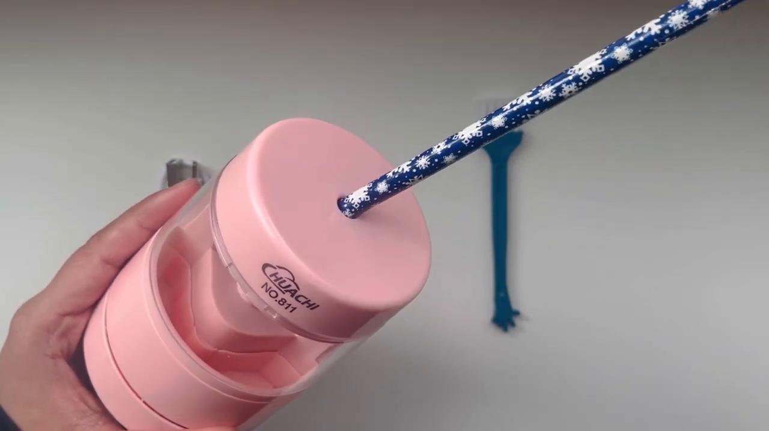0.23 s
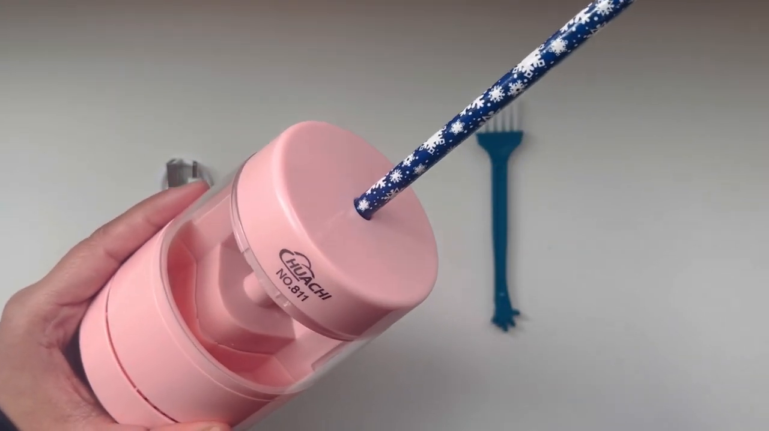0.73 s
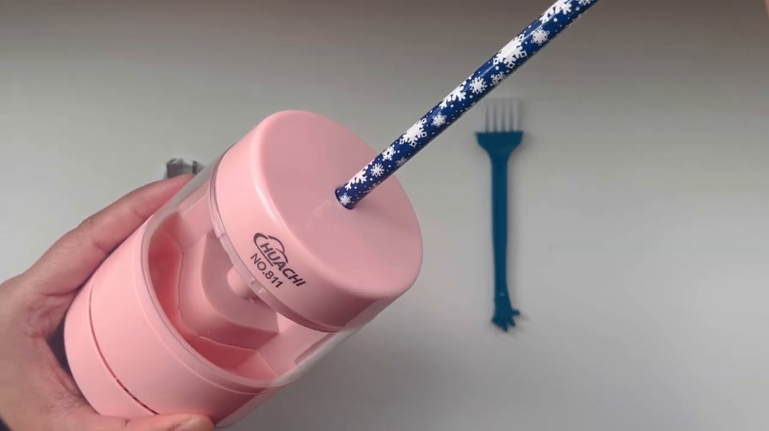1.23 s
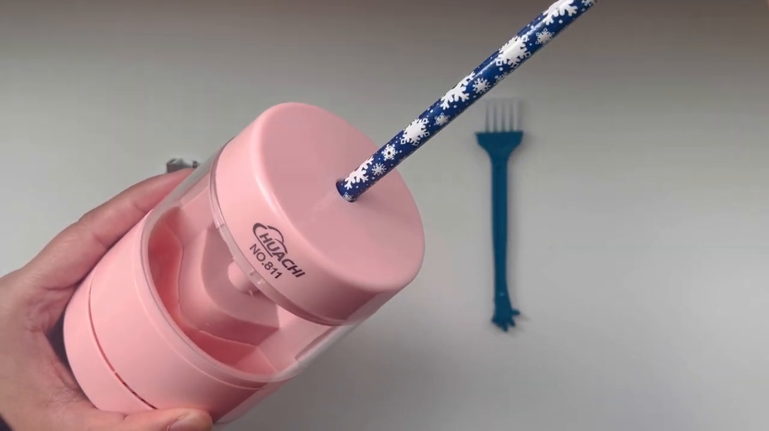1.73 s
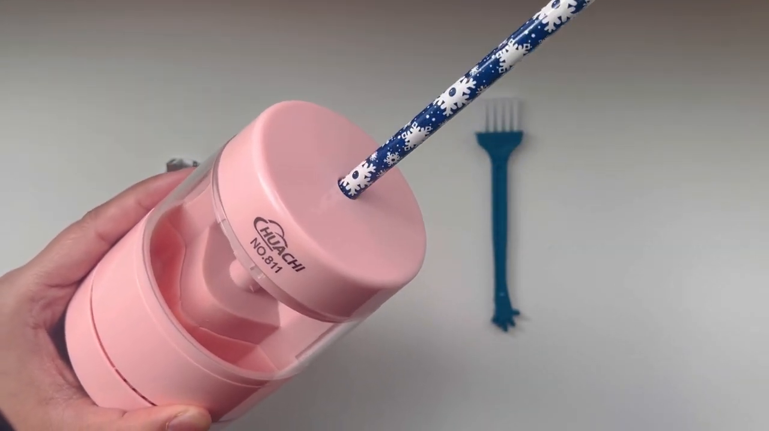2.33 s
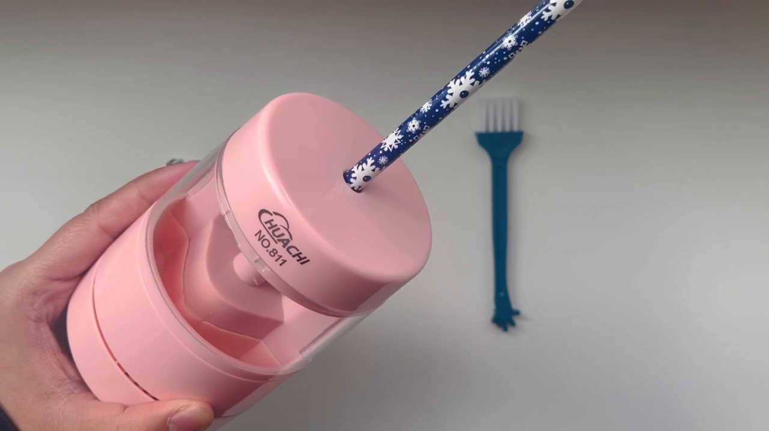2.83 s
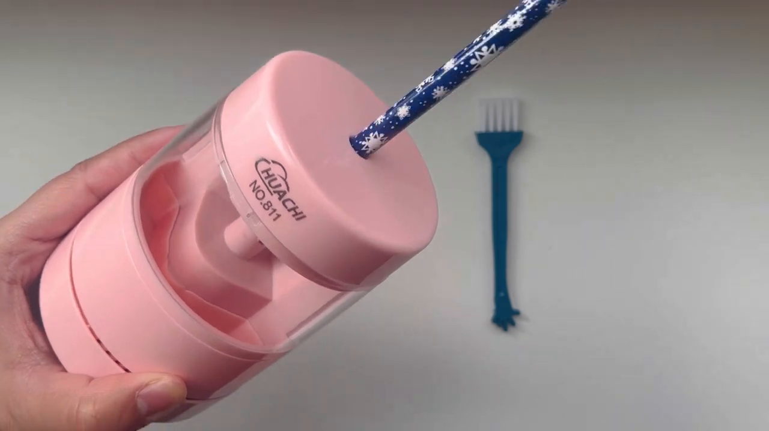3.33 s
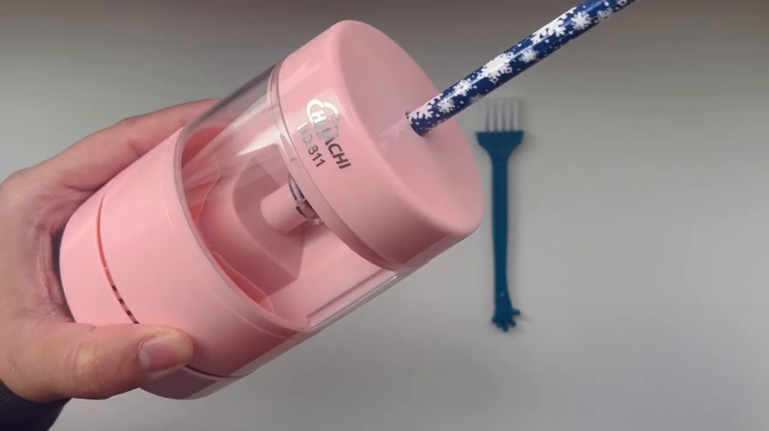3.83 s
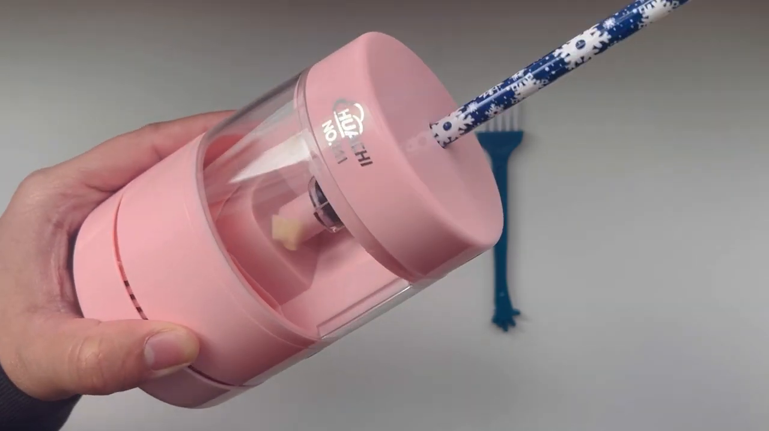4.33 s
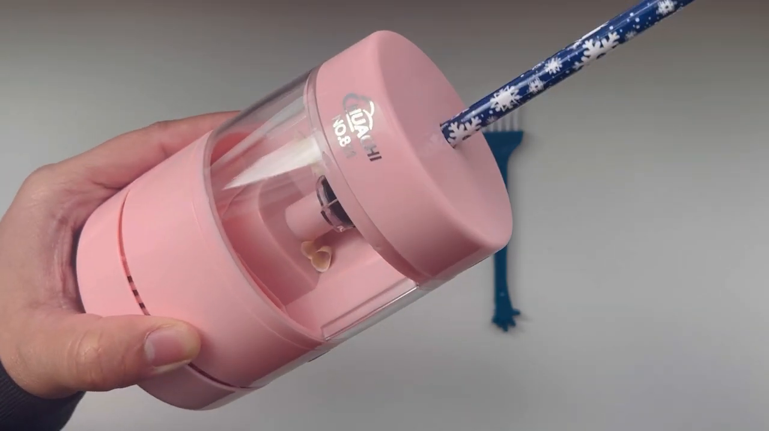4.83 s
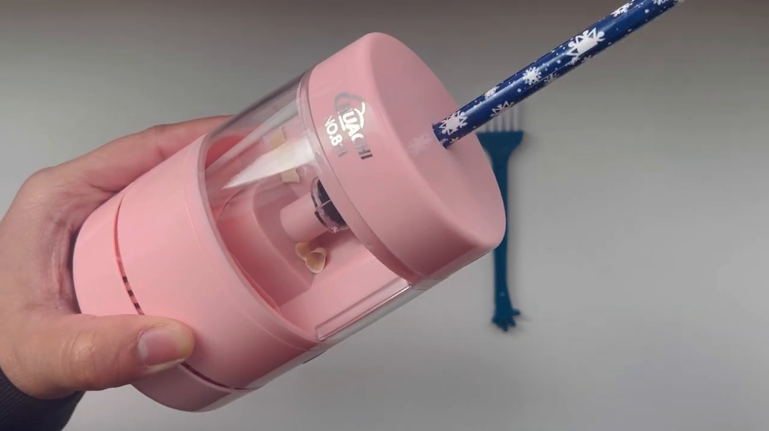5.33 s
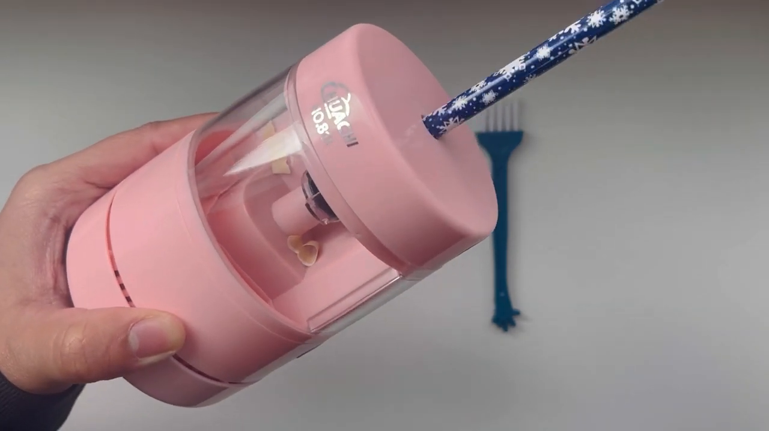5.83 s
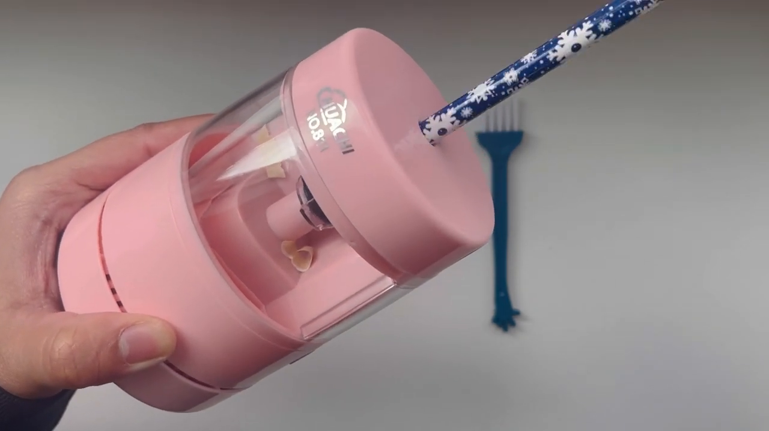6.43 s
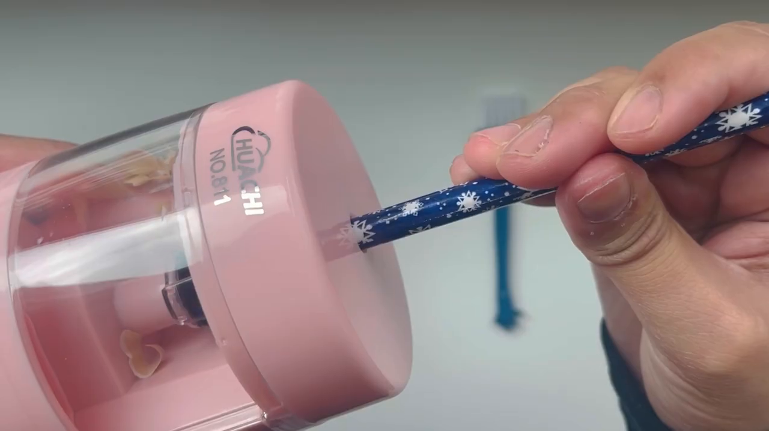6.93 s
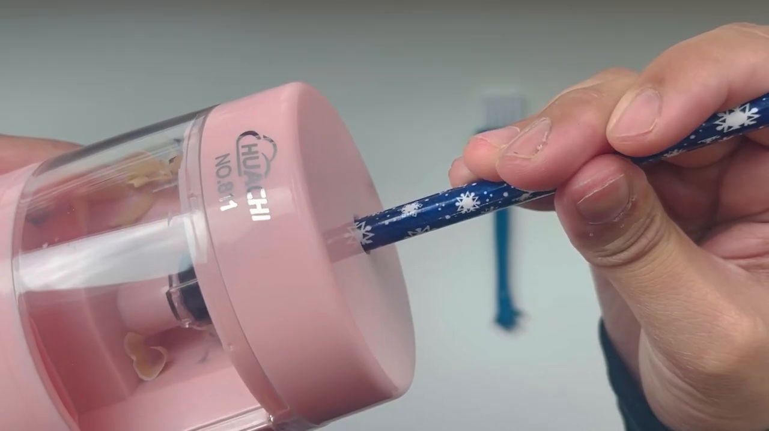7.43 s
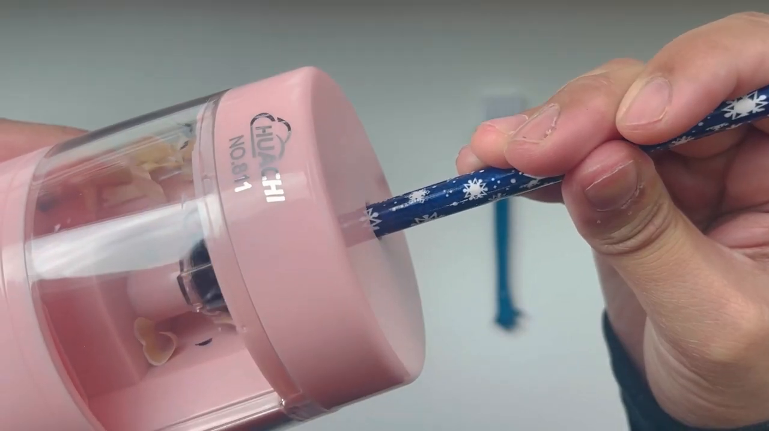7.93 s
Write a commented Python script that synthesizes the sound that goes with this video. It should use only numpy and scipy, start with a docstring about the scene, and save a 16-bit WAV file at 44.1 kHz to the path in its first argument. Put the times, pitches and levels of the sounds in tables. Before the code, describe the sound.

Close-up battery pencil sharpener: soft handling ticks, a switch click, then a continuous high gear whine with gritty wood crackle, cutting harder near the end.

```python
"""Battery pencil sharpener

A hand-held sharpener, close by in a small room. A pencil rubs along the guide and trips the switch; a small
motor spins up, its plastic gears whine and rattle, and each bite of the blade slows it. Near the end it is
held closer and cuts harder. The gears are tones locked to one shaft, the wood is coloured noise,
the clicks are decaying rings, and the room adds an echo and a faint drone."""
import sys
import numpy as np
from scipy import signal
from scipy.fft import rfft, irfft, next_fast_len
from scipy.io import wavfile
from scipy.ndimage import map_coordinates

SR = 44100
rng = np.random.default_rng(int(sys.argv[2]) if len(sys.argv) > 2 else 0)


def dump_mix(stems):
    """Bounce the given channels to the path in sys.argv[1] as a 16-bit WAV at rate SR."""
    frames = np.atleast_2d(stems).T  # one column per channel
    limited = np.clip(frames, -1, 1)  # hard clip at full scale
    pcm = np.round(limited * 32767).astype(np.int16)
    wavfile.write(sys.argv[1], SR, pcm)


N = 361619  # length in samples
TIME = np.arange(N) / SR  # s


def amp(db):
    """Decibels to gain."""
    return 10 ** (np.asarray(db) / 20)


def unit(x):
    """Scaled to rms 1."""
    return x / np.sqrt(np.mean(x ** 2) + 1e-20)


def along(points, hz):
    """Read a (frequency, value) curve on a log frequency axis."""
    point_hz, value = np.transpose(points)
    return np.interp(np.log(hz + 1), np.log(point_hz + 1), value)


def curves(rows):
    """One value per sample for each column after the time."""
    time_s, *columns = np.transpose(rows)
    return [np.interp(TIME, time_s, column) for column in columns]


def bump(s, length):
    """A smooth rise from 0 to 1 and back, centred on s."""
    return np.cos(np.pi * np.clip((TIME - s) / length, -.5, .5)) ** 2


def noise():
    """White noise of rms 1."""
    return rng.standard_normal(N)


def wobble(rate):
    """A smooth random curve, rate knots a second."""
    knots = rng.standard_normal(int(N * rate / SR) + 4)
    return map_coordinates(knots, [np.arange(N) * rate / SR])


def filtered(x, response):
    """x times a complex response of frequency."""
    m = next_fast_len(N + SR // 2)
    return irfft(rfft(x, m) * response(np.fft.rfftfreq(m, 1 / SR)), m)[..., :N]


def coloured(x, spectrum):
    """x given a spectrum, at rms 1."""
    return unit(filtered(x, lambda hz: amp(along(spectrum, hz))))


def tone(cycles):
    """A sine of rms 1 that starts anywhere in its cycle."""
    return np.sqrt(2) * np.sin(2 * np.pi * (cycles + rng.random()))


# colour of the room's rumble: pitch_hz [Hz], relative level_db [dB per Hz]
RUMBLE_COLOUR = [(20, -37), (45, -5), (80, 5.5), (110, -5), (150, -7), (300, -15), (1000, -52), (3000, -43),
                 (14000, -51)]
# the rumble swells: centre_s [s], length_s [s], extra level_db [dB]
RUMBLE_SWELLS = [(.18, .35, 6), (1.28, 0.28, 7), (1.849, .5, 7), (2.26, 0.42, 14.5), (8.1, .9, 7)]
# the two hums, low and high: pitch_hz [Hz]
HUM_PITCHES = [98, 130.8]
# levels of the hums before they waver: time_s [s], low_level_db [dB], high_level_db [dB]
HUM_LEVELS = [(0, -72, -70), (.45, -73, -72), (.75, -57, -58), (1.15, -83, -63.5), (1.7, -59, -62.5),
              (2.9, -67, -62), (3.7, -60, -53.5), (4.6, -67, -62.5), (5.15, -65, -55.5), (5.9, -71, -67),
              (6.55, -55.5, -59), (7.15, -78, -77), (8.2, -68, -65)]
RUMBLE_DB = -65  # between swells


def drone(waver_db=2):
    """Low rumble of filtered noise that swells now and then, with two hums wavering in level and phase."""
    rumble_db = RUMBLE_DB + sum(db * bump(s, length) for s, length, db in RUMBLE_SWELLS)
    hums = np.zeros(N)
    for hz, db in zip(HUM_PITCHES, curves(HUM_LEVELS)):
        level = amp(db + waver_db * wobble(5))
        hums += level * tone(hz * TIME + 0.11 * wobble(7))
    return amp(rumble_db) * coloured(noise(), RUMBLE_COLOUR) + hums


# how long the echo rings: pitch_hz [Hz], t60_s [s]
ROOM_DECAY = [(200, 0.55), (2000, 0.35), (7000, 0.29), (12000, 0.14)]
# how strongly the walls answer: pitch_hz [Hz], echo level_db [dB]
WALL_COLOUR = [(100, -24), (400, -8), (1000, -9), (1600, -17), (12000, -18)]


def room(x):
    """The walls' answer: a decaying noise tail, different on each side, its highs dying sooner."""
    hz, t, bins = signal.stft(rng.standard_normal((2, SR // 2)), SR, nperseg=256)
    decay = amp(-60 * t / along(ROOM_DECAY, hz)[:, None])
    tail = signal.istft(bins * decay, SR, nperseg=256)[1]
    echo = signal.fftconvolve(x[None], tail / np.linalg.norm(tail[0]), axes=1)[:, :N]
    return filtered(echo, lambda hz: amp(along(WALL_COLOUR, hz)))


# colour of fingers on the case: pitch_hz [Hz], relative level_db [dB per Hz]
SKIN_COLOUR = [(200, -1), (600, 5), (1500, 7), (2500, -12), (4000, -25), (7000, -13), (12000, -27)]
# colour of the pencil rubbing in the guide: pitch_hz [Hz], relative level_db [dB per Hz]
RUB_COLOUR = [(180, -37), (300, -18), (527, -14), (660, -17), (1400, -6.5), (2130, -1.5), (2940, -12),
              (10800, -14.5), (14000, -66)]
# fingers shift on the case: time_s [s], level_db [dB]
GRIP_LEVEL = [(.08, -90), (.098, -74), (.103, -63), (.12, -76), (.146, -78.5), (.152, -70), (.19, -72),
              (.24, -69), (.39, -86), (.41, -78), (.48, -60), (.54, -74), (.64, -89.5)]
# the pencil slides in the guide: time_s [s], level_db [dB]
SLIDE_LEVEL = [(.39, -99), (.41, -67), (.445, -58), (.485, -57), (.5, -85), (.55, -110)]
# pencil and switch clicks: start_s [s], level_db before the ring and crack trims [dB]
CLICK_TIMES = [(.15, -64), (0.201, -39), (0.252, -24.5), (0.459, -40), (0.467, -35), (0.481, -27.5),
               (0.487, -32), (0.651, -28)]
# modes of the guide tube: pitch_hz [Hz], relative level_db [dB], t60_s before the cap on ringing [s]
GUIDE_MODES = [(640, -23, 0.15), (1030, -2, 0.068), (1536, 1, 0.061), (2420, -3, 0.045), (3900, 10, 0.012),
               (5260, -16, 0.03), (5949, -23.5, 0.079), (6980, -1, 0.036), (8160, 7, 0.015),
               (10850, -38, 0.093)]


def friction(level_rows, spectrum):
    """Skin or wood drags over plastic: noise with a fast random grain."""
    grain = amp(4.1 * wobble(147.4))
    return amp(curves(level_rows)[0]) * coloured(noise() * grain, spectrum)


def pencil(crack_t60=0.033, longest_ring_t60=0.045, ring_db=-20, crack_db=-11):
    """Fingers shift on the case; the pencil rubs along the guide, ticks against it and closes the switch."""
    out, t = np.zeros(N), np.arange(SR // 4) / SR
    rub = coloured(noise(), RUB_COLOUR)
    for s, db in CLICK_TIMES:
        ring = np.zeros(len(t))
        for hz, level, t60 in GUIDE_MODES:
            struck_db = level + 2 * rng.standard_normal()  # no two clicks strike alike
            decay = amp(struck_db - 60 * t / min(t60, longest_ring_t60))
            ring += decay * np.sin(2 * np.pi * hz * t)
        at = round(s * SR)
        crack = amp(db + crack_db - 60 * t / crack_t60) * rub[at:at + len(t)]
        out[at:at + len(t)] += amp(db + ring_db) * ring + crack
    return out + friction(SLIDE_LEVEL, RUB_COLOUR) + friction(GRIP_LEVEL, SKIN_COLOUR)


# broad colour of the housing: pitch_hz [Hz], relative level_db [dB per Hz]
HOUSING_COLOUR = [(150, -19), (400, -27), (800, -22.5), (1400, -5.5), (3300, -12), (4600, -4.5),
                  (6200, -2.5), (8800, 4), (11500, 2.5), (12400, -14), (13200, -8.5), (14200, -62)]
# resonances of the housing on top: pitch_hz [Hz], width_hz [Hz], boost_db [dB]
HOUSING_MODES = [(1858, 178, 16), (2386, 264, 12.5), (3041, 380, 13.5), (3615, 184, 13), (4023, 367, 16.5),
                 (4826, 223, 8), (5530, 755, 8.5), (6600, 280, 3), (7590, 660, 11.5), (8404, 250, 8.5),
                 (9800, 180, 11.5), (10700, 140, 6.5)]


def shell(x):
    """x radiated by the plastic housing with its resonances, at rms 1."""
    def response(hz):
        peaks = sum(db * np.exp(-((hz - centre) / width) ** 2) for centre, width, db in HOUSING_MODES)
        return amp(along(HOUSING_COLOUR, hz) + peaks)
    return unit(filtered(x, response))


# colour of snapping fibres, on top of the housing's: pitch_hz [Hz], relative level_db [dB]
CRACKLE_COLOUR = [(300, -13), (1500, -5), (6000, -3.5), (9000, -7.5), (11500, 6), (13500, 3.5)]
# single splinters crack off: start_s [s], starting level_db [dB]
SPLINTER_TIMES = [(1.992, -14), (2.006, -19), (2.023, -13), (2.039, -17), (2.043, -18)]


def splinters(t60=.002):
    """A few splinters crack off the pencil, each a very short bright burst of noise."""
    bursts = np.zeros(N)
    for s, db in SPLINTER_TIMES:
        bursts += (TIME >= s) * amp(db - 60 * np.maximum(TIME - s, 0) / t60)
    return bursts * shell(coloured(noise(), CRACKLE_COLOUR))


# gears taking up speed: time_s [s], level_db [dB]
STRAIN_LEVEL = [(.652, -130), (.656, -51), (.672, -39), (.7, -33), (.715, -35), (.75, -50), (.8, -120)]
# colour of that grinding: pitch_hz [Hz], relative level_db [dB per Hz]
SQUEAL_COLOUR = [(1500, -29), (2200, -12), (2700, 4), (3300, -6), (5200, -25), (6200, 7.5), (7200, -11),
                 (12000, -34)]


def spin_up(grain_db=1.0):
    """The teeth grind briefly while the motor takes up speed: grainy noise."""
    grain = amp(grain_db * wobble(350))
    return amp(curves(STRAIN_LEVEL)[0]) * coloured(noise() * grain, SQUEAL_COLOUR)


# motor shaft between bites, before drag and flutter: time_s [s], speed [turns per second]
SHAFT_SPEED = [(.8, 186.6), (2.3, 186.5), (3.03, 190), (3.25, 187), (4.65, 192.4), (6.6, 192.4),
               (7.5, 190.5), (8.2, 187.5)]
# the blade bites deeper and brakes the motor: centre_s [s], length_s [s], speed lost [turns per second]
BLADE_BITES = [(2.94, .18, 6), (3.54, .21, 3), (4.36, .24, 3.8), (4.78, .17, 2), (5.17, .34, 4.6),
               (5.36, .22, 2), (5.6, .21, 2.8), (5.98, .3, 3.4), (6.17, .26, 2), (6.43, .24, 3.2),
               (6.85, .24, 6), (6.99, .16, 5), (7.25, .38, 5), (7.7, .19, 9.5), (8.09, .25, 11.8)]
# how the gears sit: time_s [s], tooth pattern_db [dB], play [0-1], second mesh low_tone_db [dB],
# second mesh high_tone_db [dB], fifth overtone_db [dB]
GEAR_SEATING = [(.65, -13, 0.82, -55, -41, -50), (.9, -16, 0.61, -67, -43.5, -63),
                (2.9, -17.5, 0.58, -67, -44, -50), (3.6, -6, 0.34, -66, -47, -33.5),
                (6.9, -4, .3, -78, -45, -40), (7, -34, 0.5, -54, -63, -29), (8.2, -49, 0.51, -52, -56, -34)]
SWITCH_S, SPIN_UP_S = .639, .034  # the motor starts, and closes in on its speed with this time constant
BLADE_GEARING = 38.4  # motor turns per blade turn
HEAVY_S = 1.74  # a moment when the blade meets the pencil's high side
DRAG_HZ = 2.2  # turns per second lost there at full play
FLUTTER = .008  # share of speed at full play


def shaft():
    """Motor speed and what the bites take from it; the blade drags once a turn and loose gears flutter."""
    play = curves(GEAR_SEATING)[1]
    running = np.maximum(TIME - SWITCH_S, 0)
    sag = sum(lost * bump(s, length) for s, length, lost in BLADE_BITES)
    speed = curves(SHAFT_SPEED)[0] * (1 - np.exp(-running / SPIN_UP_S)) - sag
    blade_turns = np.cumsum(speed) / SR / BLADE_GEARING
    from_heavy_side = blade_turns - blade_turns[round(HEAVY_S * SR)]
    drag = DRAG_HZ * play * np.cos(2 * np.pi * from_heavy_side)
    return (speed - drag) * (1 + FLUTTER * play * wobble(22)), sag


# swing of the rubbing at 1, 2, 3 times a blade turn: level_db [dB]
BLADE_SWING = [0.22, 0.52, 1.0]


def blade_swing(turns):
    """Gain of the rubbing as the blade goes round, swinging at multiples of its turn."""
    return amp(sum(db * tone((k + 1) * turns / BLADE_GEARING) for k, db in enumerate(BLADE_SWING)))


# how hard the sharpener works, before bites, catches and swings: time_s [s],
# blade scrape_db at full play [dB], gear rattle_db [dB], shaving crackle_db at full play [dB]
WORK_LEVELS = [(.66, -45, -39, -48), (.72, -57, -34, -36), (1, -49.5, -29.5, -30.5), (1.5, -49, -31, -27),
               (2.8, -49, -29.5, -28), (3.4, -52, -29, -27.5), (3.9, -50, -27.5, -37),
               (5.2, -48.5, -28, -32), (6.9, -48.5, -28, -30), (6.98, -46, -26.5, -27.5),
               (8.2, -45.5, -28.5, -25.5)]
# the blade catches in the grain: centre_s [s], extra scrape_db [dB], extra crackle_db [dB]
GRAIN_CATCHES = [(1.59, 7, 5), (2.01, 5, 5), (2.12, -1.5, -1), (2.42, 3, -2), (2.5, 4, 3.5), (2.85, 4, 2),
                 (3.1, 12, 5), (3.22, 9.5, 6.5), (6.96, 9, 7), (7.18, 2, 5), (7.33, 6, 1), (7.57, 3, 4),
                 (7.82, 3, 4), (8.1, 3, -3), (8.19, 3.5, 2)]
# colour of the scrape: pitch_hz [Hz], relative level_db [dB per Hz]
SCRAPE_COLOUR = [(100, -9), (340, -10.5), (550, 0), (850, 2), (1150, 2.5), (1600, -6), (3000, -16),
                 (8000, -40)]
CATCH_S = .1  # length of a catch
BITE_SCRAPE_DB = .3  # a bite scrapes more (dB per turn per second lost)


def blade(sag, grain_db=3.5, snap_db=2.5, uneven_db=1.0):
    """The blade scrapes the wood unevenly while fibres snap off the shaving and tick in the housing."""
    scrape_db, _, crackle_db = curves(WORK_LEVELS)
    play = curves(GEAR_SEATING)[1]
    scrape_db = scrape_db + BITE_SCRAPE_DB * sag + uneven_db * wobble(16)
    crackle_db = crackle_db + uneven_db / 2 * wobble(12)
    for s, extra_scrape_db, extra_crackle_db in GRAIN_CATCHES:
        catch = bump(s, CATCH_S)
        scrape_db += extra_scrape_db * catch
        crackle_db += extra_crackle_db * catch
    scrape = coloured(noise() * amp(grain_db * wobble(200)), SCRAPE_COLOUR)
    crackle = shell(coloured(noise() * amp(snap_db * wobble(1100)), CRACKLE_COLOUR))
    return play * (amp(scrape_db) * scrape + amp(crackle_db) * crackle)


PINION, WHEEL = 10, 32  # teeth
# relative swing of tooth load at 1, 2, 3 .. times a wheel turn: size [ratio]
WHEEL_RUNOUT = [0.88, 1, 0.97, 0.33, 0.23]


def tooth_load(turns, pinion_swing=0.11):
    """Wheel and pinion are out of round, so the load on the teeth swings with each turn, at rms 1."""
    wheel = turns * PINION / WHEEL
    wheel_load = sum(swing * tone((k + 1) * wheel) for k, swing in enumerate(WHEEL_RUNOUT))
    return unit(wheel_load + pinion_swing * tone(turns))


REPEATING_DB = 2.5  # repeating rattle over the chance part, at a tooth pattern of 0 dB
BITE_RATTLE_DB = -0.1357  # a bite holds the gears still (dB per turn per second lost)


def rattle(turns, load, sag, swing_db=-0.1):
    """Tooth flanks rub and knock in the housing: part repeats with every wheel turn, part is chance."""
    share = amp(curves(GEAR_SEATING)[0] + REPEATING_DB)
    flanks = rng.standard_normal(size=720)  # one wheel turn of rough flanks
    place = turns * PINION / WHEEL * len(flanks)
    repeating = unit(map_coordinates(flanks, [place], mode="grid-wrap"))
    knocks = (share * repeating + noise()) / np.sqrt(1 + share ** 2)
    level = amp(curves(WORK_LEVELS)[1] + BITE_RATTLE_DB * sag)
    return level * shell(knocks * amp(swing_db * load))


# motor lines: pitch [multiples of a motor turn]
MOTOR_LINES = [9, 12, 21, 36]
# their levels before they waver: level_db [dB]
MOTOR_LEVELS = [-60, -56, -48.5, -53]
# lines of the wheel's uneven teeth: pitch [multiples of a wheel turn]
WHEEL_LINES = [12, 13, 14, 17, 22, 24, 25, 26, 33, 35, 43, 52]
# their levels at a tooth pattern of 0 dB, before they waver: level_db [dB]
WHEEL_LEVELS = [-64, -55.5, -60, -58, -62, -61, -60, -61, -46, -48, -54, -50]
POLES = 3
POLE_DB, POLE_PLAY_DB = -66, 7.5  # hum of the motor's poles, and its rise at full play


def gear_tones(turns, waver_db=2.04, stage_blur=0.047, middle_tone_db=-5):
    """Weaker lines: the three-pole motor, its imbalance, the wheel's uneven teeth and the second gear stage."""
    def line(cycles, db):
        return amp(db + waver_db * wobble(25)) * tone(cycles)

    pattern_db, play, low_db, high_db, _ = curves(GEAR_SEATING)
    wheel = turns * PINION / WHEEL
    poles = line(POLES * turns, POLE_DB + POLE_PLAY_DB * play)
    motor = poles + sum(line(k * turns, db) for k, db in zip(MOTOR_LINES, MOTOR_LEVELS))
    imbalance_db = curves([(3, -73), (4.5, -67), (6.9, -68), (7, -63)])[0]  # time_s, level_db
    imbalance = line(turns, imbalance_db)
    teeth = sum(line(k * wheel, db + pattern_db) for k, db in zip(WHEEL_LINES, WHEEL_LEVELS))
    second_mesh = PINION * wheel + stage_blur * play * wobble(120)  # play blurs its timing too
    stage_levels = [(2, low_db), (4, high_db + middle_tone_db), (5, high_db)]  # overtone, level_db
    stage = sum(line(k * second_mesh, db) for k, db in stage_levels)
    return motor + imbalance + teeth + stage


# first four overtones of the pinion's mesh between bites, before they waver:
# time_s [s], first_db [dB], second_db [dB], third_db [dB], fourth_db [dB]
WHINE_LEVELS = [(.7, -32.5, -50, -58, -50), (.87, -33, -39.5, -52, -38.5), (1.6, -34.5, -38.5, -42, -30),
                (2.95, -38.5, -35.5, -46, -29), (3.12, -39, -35, -37.5, -27.5),
                (3.35, -45.5, -31, -34, -25.5), (3.7, -47.5, -30, -41.5, -30), (4.1, -38.5, -31, -41, -29),
                (6.9, -36.5, -32.5, -37, -28.5), (7.03, -36, -38.5, -45, -35),
                (7.25, -33.5, -35, -47, -35.5), (7.5, -31.5, -38, -45, -34), (8.2, -32.5, -35, -43, -30)]
# a bite moves the whine upward, overtones 1-4: change_db [dB per turn per second lost]
BITE_TILT = [-0.98, 0.12, 1, 0.18]
# how far the load swings overtones 1-6, before the seating scales it: swing_db [dB]
WHINE_SWING = [5.24, 1.87, 5.1, 4.9, 1.9, 6.1]
SIXTH_DB = -13.5  # the sixth overtone follows the cutting: level against the WORK_LEVELS crackle
WHINE_WAVER_DB, WHINE_GRIT_DB = 3, 1  # slow wavering and fast random swing of each overtone at full play
MESH_SWING, MESH_BLUR = 0.034, 0.039  # teeth meet early or late by runout and by chance (share of a tooth)


def whine(turns, load, sag):
    """Overtones of the tooth rate; load swings their size, and play between teeth blurs their timing."""
    pattern_db, play, _, _, fifth_db = curves(GEAR_SEATING)
    sixth_db = curves(WORK_LEVELS)[2] + SIXTH_DB
    bearing = amp(pattern_db / 2)  # well-seated gears pass on more of the wheel's runout
    runout = MESH_SWING * bearing * tooth_load(turns)
    mesh = PINION * turns + runout + MESH_BLUR * np.sqrt(play) * wobble(240)
    levels = [db + tilt * sag for db, tilt in zip(curves(WHINE_LEVELS), BITE_TILT)]
    levels += [fifth_db, sixth_db]
    out = np.zeros(N)
    for k, (db, swing_db) in enumerate(zip(levels, WHINE_SWING)):
        # each overtone feels the runout partly in its own way; plastic teeth give under the hardest pushes
        push = unit(np.tanh(unit(load + tooth_load(turns)) / 2))
        grit_db = WHINE_GRIT_DB * np.sqrt(play) * wobble(300)
        size = amp(swing_db * bearing * push + grit_db)
        level = amp(db + WHINE_WAVER_DB * play * wobble(12))
        out += level * unit(size * tone((k + 1) * mesh))
    return out


# the two microphone ports hear the machine out of step: pitch_hz [Hz], left's lead [radians]
PORT_LEAD = [(20, 0), (1500, .1), (3000, .35), (4200, 1), (4600, 1.8), (5300, 5.6), (5700, 6.2),
             (6200, 6.4), (7500, 8), (8800, 9.35), (9400, 9.5), (12000, 12.4), (15000, 12.6)]
SINGS_FROM = 180  # the gears only sing once they near this speed (turns per second)


def scene():
    """One shaft drives every part; the sound reaches the two microphone ports out of step."""
    speed, sag = shaft()
    turns = np.cumsum(speed) / SR
    load = tooth_load(turns)
    singing = np.minimum(np.maximum.accumulate(speed) / SINGS_FROM, 1) ** 12
    rubbing = blade_swing(turns) * (rattle(turns, load, sag) + blade(sag))
    machine = singing * whine(turns, load, sag) + singing ** 2 * gear_tones(turns) + rubbing
    starting = amp(curves([(.645, -120), (.655, -6), (.69, 0.5)])[0])  # time_s, level_db
    dip = curves([(6.935, 1), (6.937, .05), (6.962, 1)])[0]  # the level dips briefly: time_s, gain
    near = starting * dip * machine + spin_up() + pencil() + splinters()
    # half the lead to the left, half the lag to the right
    direct = filtered(near, lambda hz: np.exp(np.outer([1, -1], 1j * along(PORT_LEAD, hz) / 2)))
    return direct + room(near) + drone()


TOP_HZ = 14000  # band limit


def record(dry):
    """Nothing is kept above the band limit."""
    return filtered(dry, lambda hz: hz < TOP_HZ)


dry = scene()
out = record(dry)
dump_mix(out)
```